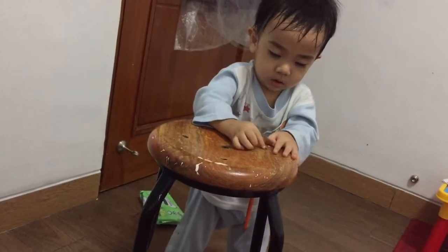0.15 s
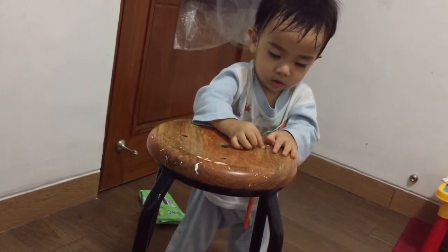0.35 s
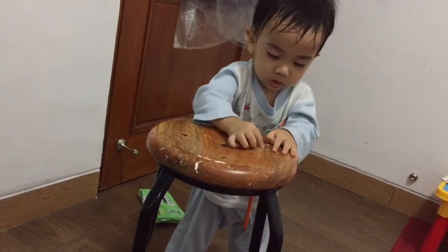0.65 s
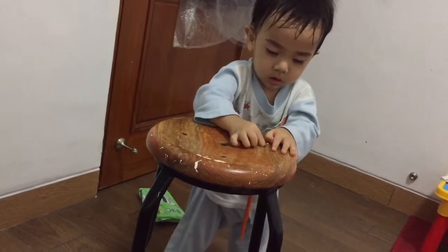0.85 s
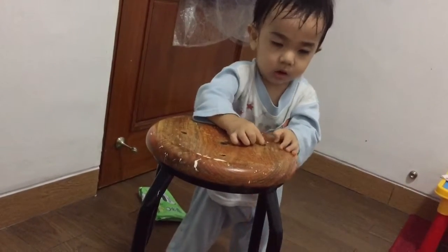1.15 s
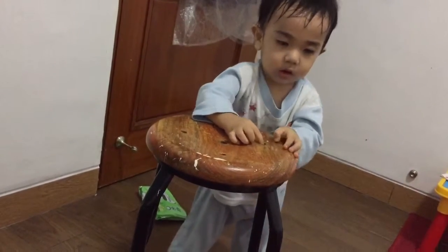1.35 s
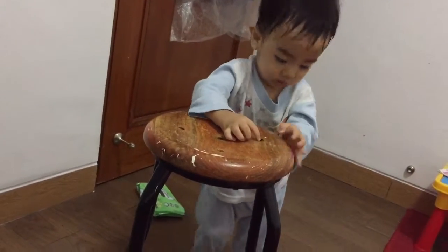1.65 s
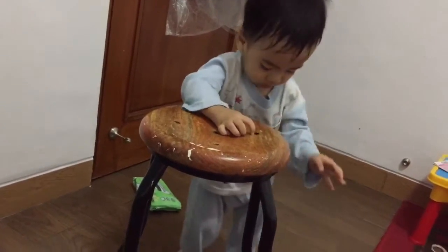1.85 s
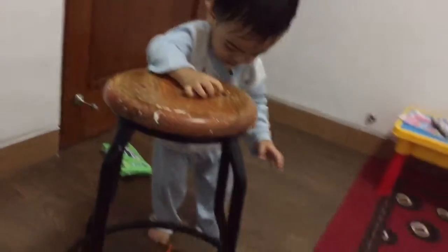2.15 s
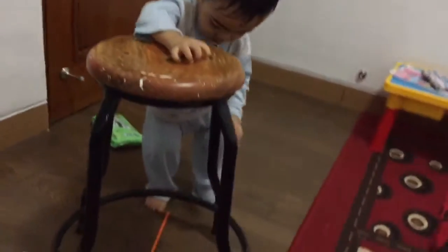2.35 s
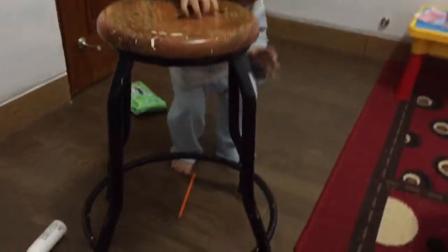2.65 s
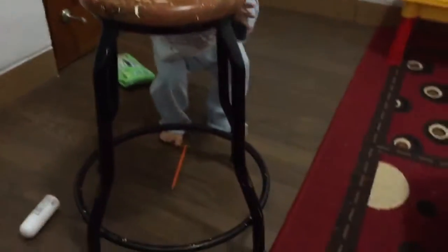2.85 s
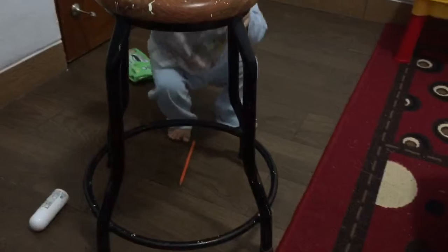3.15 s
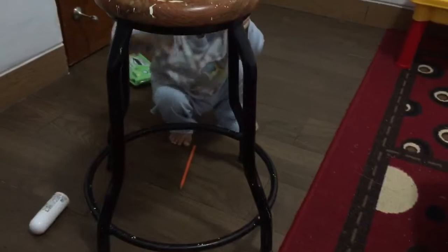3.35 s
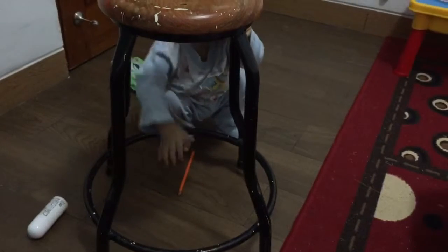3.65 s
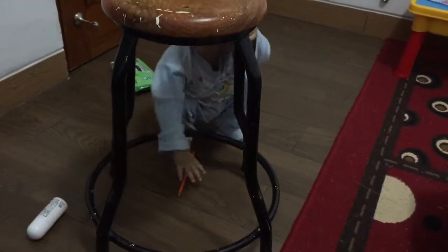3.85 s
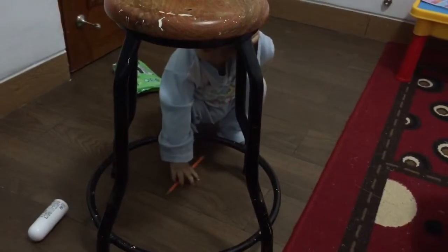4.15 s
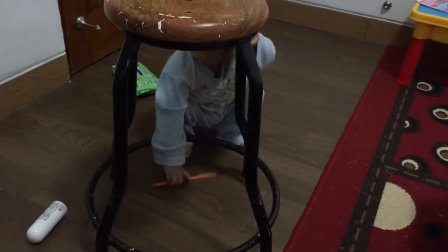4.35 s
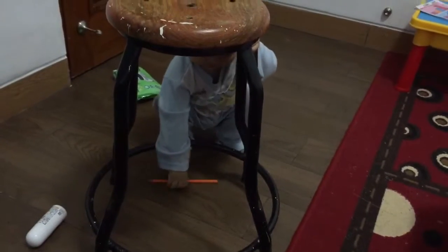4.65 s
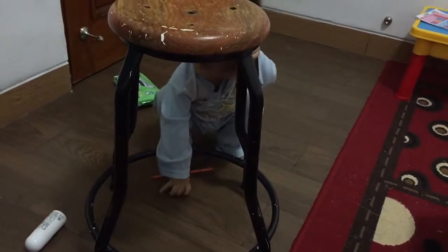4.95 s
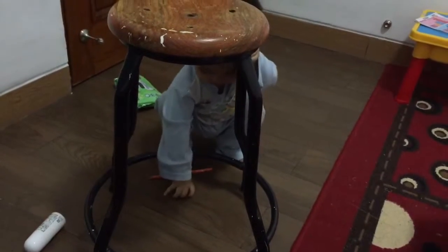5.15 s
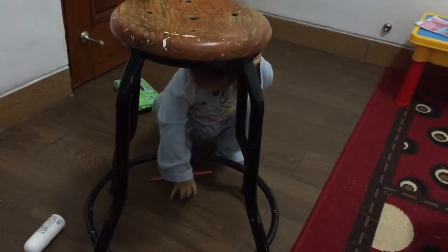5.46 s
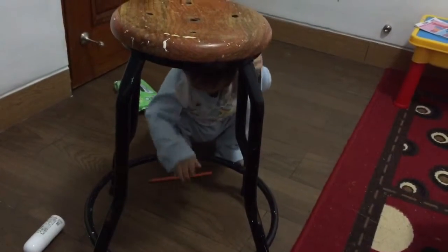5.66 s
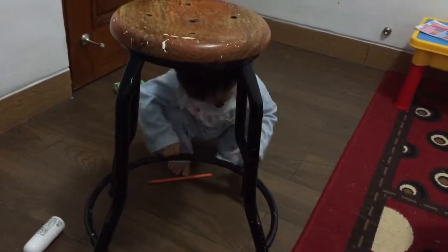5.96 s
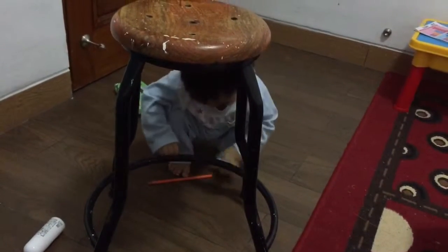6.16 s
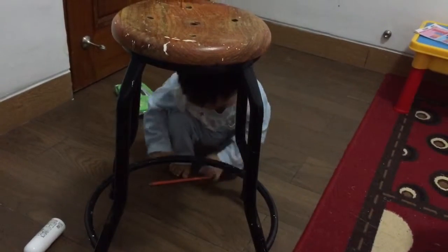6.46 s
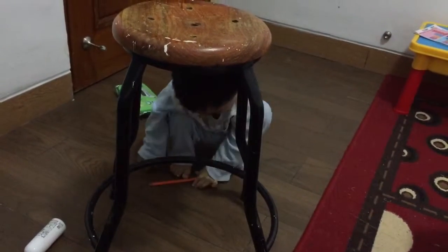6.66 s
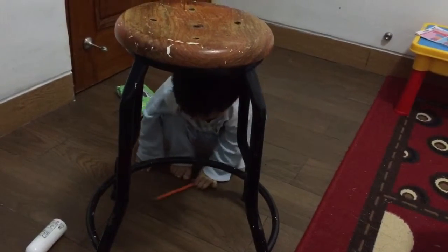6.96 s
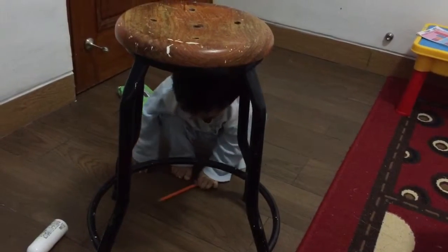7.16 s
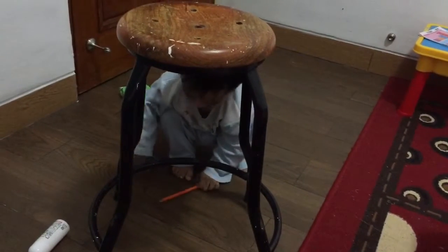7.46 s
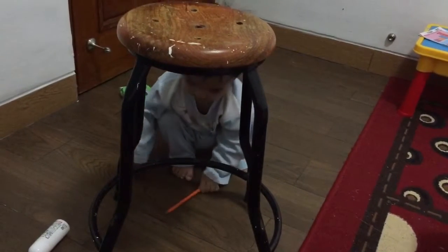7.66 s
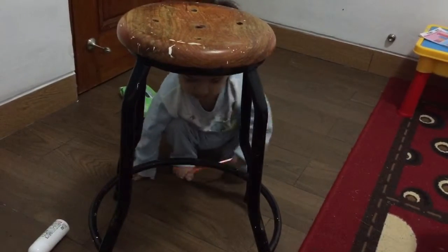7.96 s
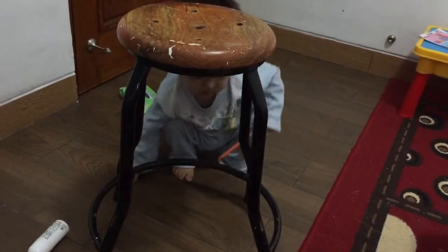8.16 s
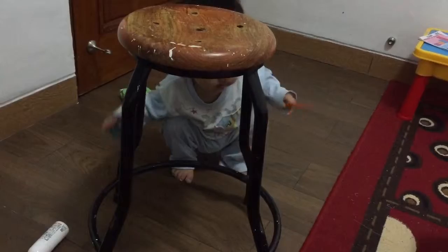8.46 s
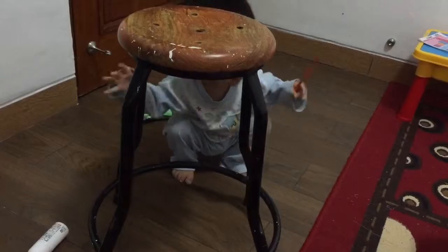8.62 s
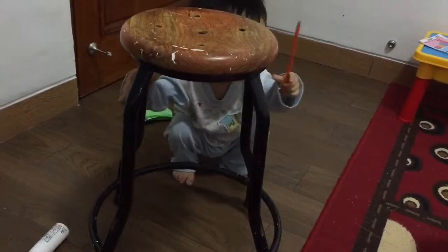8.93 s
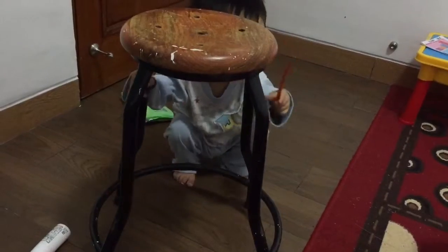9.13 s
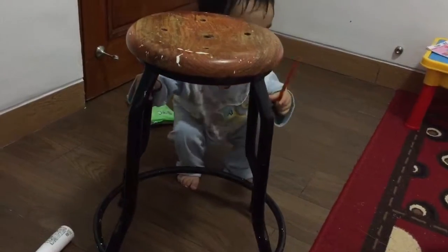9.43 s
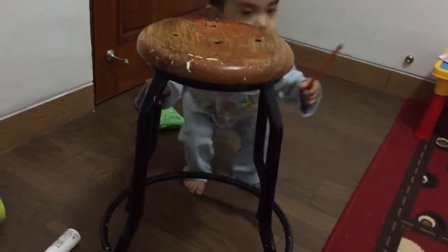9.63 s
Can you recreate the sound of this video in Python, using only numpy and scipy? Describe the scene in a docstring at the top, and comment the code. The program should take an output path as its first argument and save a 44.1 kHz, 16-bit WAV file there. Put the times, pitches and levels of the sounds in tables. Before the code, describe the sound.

A pencil ticks and drops onto a wooden floor with a bright clatter, then soft limb thuds, cloth rustle and two ringing taps on a steel stool.

```python
"""A small room with a wooden floor, where a toddler plays at a steel-legged stool; hand-held camera.
A pencil ticks, drops and bounces: noisy contacts excite its tip, its bending modes and the wood below.
Hands and knees bump the boards and the foot ring through soft low-pass contacts; sleeves brush as noise.
Then the pencil strikes the steel frame twice: beating modes over a dense clatter.
Nearest the microphone are faint low handling bumps; behind everything lies steady room noise."""
import sys
import numpy as np
from scipy import signal
from scipy.fft import rfft, irfft, next_fast_len
from scipy.io import wavfile
from scipy.ndimage import uniform_filter1d

SR = 44100
rng = np.random.default_rng(int(sys.argv[2]) if len(sys.argv) > 2 else 0)


def unload_wav(signal):
    """Save mono or channel-first audio to the path in sys.argv[1] as 16-bit WAV at rate SR, clipped to [-1, 1]."""
    wavfile.write(
        sys.argv[1],
        SR,
        np.round(np.clip(np.atleast_2d(signal).T, -1, 1) * 32767).astype(np.int16),
    )


N = 431738

# Pencil contacts. Each row: start in seconds, ring level in dB, ring tilt in dB per octave,
# tip crack level in dB, level of the knock of the wood in dB.
PENCIL_CONTACTS = [(1.2383, -37, -4.5, -40.5, -34), (1.3363, -61, 8, -60, -49.5),
                   (1.6334, -23, 8.5, -23, -47), (1.7536, -28.5, 5.5, -44, -56.5),
                   (1.961, -47, -4.5, -62, -70), (3.486, -56, -11.5, -75.5, -74),
                   (5.131, -55, -6, -67, -69), (5.1427, -40.5, 4.5, -45.5, -50),
                   (5.1815, -52, -1, -68, -69.5), (8.1545, -57, 0, -45.5, -40.5)]
# After the drop each end of the pencil bounces on. Each row: first bounce in seconds,
# its ring level in dB, flight to the next bounce in seconds.
PENCIL_END_BOUNCES = [(1.798, -45.5, .083), (1.8585, -55, .099)]
# Bending modes of the pencil. Each row: usual frequency in Hz, width in Hz, level in dB.
PENCIL_MODES = [(2207, 111.3, -5.5), (4050, 150, 2.5), (6183, 250, 2), (8840, 420, 3), (11700, 500, -0.5),
                (15120, 1600, -9)]
# Colour of the tip's crack. Each row: frequency in Hz, level in dB per Hz.
TIP_CRACK_COLOUR = [(60, -48), (400, -32), (900, -17.5), (2000, 2.5), (2700, -6.5), (3600, -5.5),
                    (5500, 1.5), (7500, -13), (10000, 4), (11700, 8), (13000, 6), (15500, 6.5)]
# Colour of the wood under the tip. Each row: frequency in Hz, level in dB per Hz.
WOOD_KNOCK_COLOUR = [(40, -38.5), (200, -16), (600, -15), (950, 0), (1400, -2), (2100, -6), (2800, -15.5),
                     (5000, -25.5), (12000, -40)]
# Pencil blows on the steel frame. Each row: start in seconds, ring gain in dB, clatter level in dB,
# place (0 = foot ring, 1 = leg), ring time as a share of the usual.
FRAME_BLOWS = [(8.1402, -2, -30, 0, 1.4), (8.384, 1, -27.5, 1, 0.92)]
# Modes of the frame. Each row: frequency in Hz, usual decay time t60 in seconds,
# level in dB struck at the foot ring, level in dB struck at the leg.
FRAME_MODES = [(280, 0.55, -51, -57), (587, 0.3, -33, -57), (640, 0.3, -28, -65), (678, 0.3, -37, -68),
               (797, 0.3, -40, -70), (856, 0.3, -39, -67), (990, 0.35, -34, -66), (1276, 0.33, -34, -36),
               (1410, 0.4, -46, -50), (1510, 0.28, -37, -44), (1595, 0.25, -57, -38),
               (1712, 0.25, -51, -32), (1750, 0.3, -44, -28), (1841, 0.3, -40, -46), (1890, 0.27, -38, -47),
               (2482, 0.22, -46, -57), (2681, 0.22, -55, -33), (2740, 0.28, -63, -38),
               (2790, 0.25, -57, -36), (2950, 0.32, -48, -35), (3342, 0.2, -44, -43),
               (3467, 0.27, -55, -42), (3531, 0.31, -59, -36), (4011, 0.25, -50, -40),
               (4109, 0.23, -46, -36), (4382, 0.3, -50, -42), (5572, 0.22, -54, -45),
               (6320, 0.33, -46, -61), (6385, 0.31, -47, -62), (8064, 0.33, -61, -46),
               (15600, 0.16, -51, -63)]
# Dense, short-lived modes of the frame. Each row: frequency in Hz, level in dB per Hz at the
# foot ring, level in dB per Hz at the leg.
CLATTER_COLOUR = [(50, -50, -51), (196, -22, -9.5), (515, -1, -21), (620, 10.5, -18), (1050, 1, -23),
                  (1184, 4, 7), (1930, 8.5, 1), (2220, -6, -11.5), (2870, -1, 10.5), (3750, -9, 0),
                  (4490, -1, 10.5), (4840, -12, 0), (6160, 0.5, -3.5), (7600, -13, -9.5), (8730, -7.5, 3.5),
                  (9200, -18, -15.5), (14850, -30, -17.5)]
# Soft bumps of hands, knees and feet. Each row: start in seconds, boards level in dB, first contact
# corner in Hz, frame gain in dB, deep boom level in dB, loss at each later contact in dB.
LIMB_BUMPS = [(3.365, -52, 300, -44, -72, 16), (3.471, -41.5, 754, -15.5, -51, 0.3),
              (3.6635, -56, 1800, -38, -62, 12), (3.801, -47, 297, -22, -52, 8),
              (3.985, -53.5, 900, -32, -61, 7), (5.143, -54.5, 694, -25, -60.5, 7),
              (5.402, -39.5, 545, -24, -61, 8.5), (5.4461, -47.5, 1013, -19, -46.5, 9.5),
              (6.108, -54.5, 700, -11.5, -55.5, 14), (7.326, -55, 247, -43, -65.5, 18.5),
              (8.779, -48.5, 1100, -36, -64, 8), (9.248, -44.5, 910, -22, -48, 4)]
# Modes of the floorboards. Each row: frequency in Hz, width in Hz, level in dB.
BOARD_MODES = [(178.4, 35, 4.5), (220.6, 24, 6.5), (247, 38, 0.5), (349, 104, -2), (374.4, 35, -1.5),
               (516, 124, -10), (613, 130, -4.5), (840, 190, -1.5), (1054, 130, -10.5), (1270, 300, -11.5),
               (1640, 700, -12.5)]
# Deep modes of the whole floor. Each row: frequency in Hz, width in Hz, level in dB.
FLOOR_MODES = [(48.5, 5.5, -4.5), (82, 32, -2)]
# Longer strokes of sleeves and palms. Each row: middle in seconds, half length in seconds,
# scuff level in dB, cloth hiss level in dB.
STROKES = [(2.852, 0.0093, -64.5, -73), (3.77, 0.11, -63, -76), (3.98, 0.04, -59.5, -64),
           (5.674, 0.072, -71, -76), (5.957, .17, -81, -70.5), (6.085, 0.052, -69, -64.5)]
# Colour of palms on wood. Each row: frequency in Hz, level in dB per Hz.
SCUFF_COLOUR = [(250, -18), (750, 9), (1400, 8), (2200, -3.5), (4000, -21.5)]
# Colour of the cloth hiss. Each row: frequency in Hz, level in dB per Hz.
CLOTH_COLOUR = [(1500, -6), (3000, 11.5), (4600, -3), (6300, 7), (7400, -2), (8600, 8), (10300, -2),
                (12000, 2), (15500, -3)]
# Fingers shift on the camera. Each row: start in seconds, level in dB, frequency settled to in Hz.
FINGER_SHIFTS = [(2.507, -61, 85), (2.706, -49.5, 82), (2.844, -49, 87), (9.678, -55.5, 59.7)]
# Colour of the steady room noise. Each row: frequency in Hz, relative level in dB.
ROOM_NOISE_COLOUR = [(22, -30.5), (38, -11), (55, 0.5), (145, -5), (180, -2), (240, -5.5), (550, -8),
                     (1500, -9), (1950, -5.5), (2700, -13), (4200, -15.5), (5200, -20), (9000, -23),
                     (10300, -25), (15800, -26)]
# Decay of the room's diffuse tail. Each row: frequency in Hz, t60 in seconds.
ROOM_DECAY = [(150, .3), (1000, 0.25), (4000, 0.36), (9000, 0.26), (15000, 0.23)]
# Early echoes off the nearest walls. Each row: delay in seconds, level in dB against the diffuse tail.
WALL_ECHOES = [(.0063, -24), (0.0149, -27), (0.015, -7.5), (.0242, -11.5), (0.0325, -23)]

PITCH_SCATTER = .008  # share of the pitch; each landing loads the pencil differently
FLIGHT_SHRINK, BOUNCE_LOSS_DB = .62, 5.5  # each flight over the last; loss a bounce
# Tilt in dB per octave; crack and knock relative to the ring.
BOUNCE_TILT_DB, BOUNCE_CRACK_DB, BOUNCE_KNOCK_DB = -3.5, -15, -16
SETTLE_S, SETTLE_SCATTER_S = .0195, 0.0019  # mean gap between a limb's contacts, and its scatter
SETTLE_SOFTENS = 0.93  # contact corner over the last one
BRUSH_LAG_S, BRUSH_HALF_S = 0.015, 0.028  # the sleeve brushes along just after each bump
BRUSH_SCUFF_DB, BRUSH_CLOTH_DB = -21.5, -37  # relative to the boards
ROOM_NOISE_DB = -66
TOP_HZ = 15850  # the camera's band limit
AGE = np.arange(SR * 3 // 4) / SR  # time since a blow (s)
BINS = np.fft.rfftfreq(len(AGE) * 2, 1 / SR)  # (Hz)


def pencil():
    """Each contact cracks at the tip, rings the pencil's bending modes and knocks the wood beneath."""
    out = np.zeros(N)
    lowest_hz = PENCIL_MODES[0][0]
    octaves = np.log2(np.maximum(BINS, lowest_hz) / lowest_hz)
    for s, ring_db, tilt_db, crack_db, knock_db in [*PENCIL_CONTACTS, *bounces()]:
        hardness = causal(tilt_db * octaves)
        modes = np.array(PENCIL_MODES) * [1 + PITCH_SCATTER * rng.standard_normal(), 1, 1]
        ring = through(contact(t60=0.037, chatter=0.76), resonances(modes) * hardness)
        crack = through(contact(t60=0.022, chatter=1.5), causal(along(TIP_CRACK_COLOUR, BINS)))
        knock = through(contact(t60=.025, chatter=0.34), causal(along(WOOD_KNOCK_COLOUR, BINS)))
        add(out, s, in_room(amp(ring_db) * ring, wet_db=-6.0))
        add(out, s, in_room(amp(crack_db) * crack, wet_db=-6))
        add(out, s, in_room(amp(knock_db) * knock, wet_db=-2.5))
    return out


def bounces(count=4):
    """Each end of the fallen pencil lands ever sooner and more softly."""
    k = np.arange(count)
    for start, first_db, flight in PENCIL_END_BOUNCES:
        flights = flight * FLIGHT_SHRINK ** k
        starts = start + np.cumsum(flights) - flights
        for s, db in zip(starts, first_db - BOUNCE_LOSS_DB * k):
            yield s, db, BOUNCE_TILT_DB, db + BOUNCE_CRACK_DB, db + BOUNCE_KNOCK_DB


def frame_blows():
    """Hard blows on the steel tube: clear modes over a dense clatter."""
    out = np.zeros(N)
    for s, ring_db, clatter_db, place, sustain in FRAME_BLOWS:
        colour = np.array(CLATTER_COLOUR)[:, [0, 2 if place > .5 else 1]]
        clatter = through(contact(t60=0.083, chatter=3.9), causal(along(colour, BINS)))
        add(out, s, amp(ring_db) * frame_ring(place, sustain=sustain))
        add(out, s, in_room(amp(clatter_db) * clatter, wet_db=-1.5))
    return out


def frame_ring(place, corner_hz=np.inf, attack=0.0012, sustain=1):
    """The frame's modes; a soft contact weakens the high ones, and close pairs make each one beat."""
    hz, t60, ring_db, leg_db = np.transpose(FRAME_MODES)[:, :, None]
    size = amp(leg_db if place > .5 else ring_db) / (1 + (hz / corner_hz) ** 2)
    twin_hz = hz + rng.choice([-1, 1], hz.shape) * rng.uniform(12, 30, hz.shape)
    phase = rng.random((2, *hz.shape))  # in turns
    mode = np.sin(2 * np.pi * (hz * AGE + phase[0]))
    twin = np.sin(2 * np.pi * (twin_hz * AGE + phase[1]))
    ring = (size * fade(t60 * sustain) * (mode + .3 * twin)).sum(0)
    return ring * (1 - np.exp(-AGE / attack))


def bumps():
    """Soft limbs thud on the boards and shake the foot ring; the softer the contact, the duller and slower."""
    out = np.zeros(N)
    for s, boards_db, corner_hz, frame_db, boom_db in settling():
        flesh = 1 / (1 + 1j * BINS / corner_hz) ** 2
        thud = through(contact(t60=0.027, chatter=0.95), resonances(BOARD_MODES) * flesh)
        boom = through(AGE == 0, resonances(FLOOR_MODES) * flesh)
        ring = frame_ring(place=0, corner_hz=corner_hz, attack=2 / corner_hz)
        ring = ring * fade(t60=0.94)  # the limb damps the tube
        add(out, s, in_room(amp(boards_db) * thud, wet_db=-5.0))
        add(out, s, amp(boom_db) * boom + amp(frame_db) * ring)
    return out


def settling(count=4):
    """A limb lands, then settles in ever weaker and softer contacts."""
    for s, boards_db, corner_hz, frame_db, boom_db, loss_db in LIMB_BUMPS:
        gaps = SETTLE_S + SETTLE_SCATTER_S * rng.standard_normal(count)
        for k in range(count):
            lost_db = k * loss_db
            if lost_db < 20:  # weaker contacts are left out
                start, softer_hz = s + gaps[:k].sum(), corner_hz * SETTLE_SOFTENS ** k
                yield start, boards_db - lost_db, softer_hz, frame_db - lost_db, boom_db - lost_db


def slides():
    """Palms scuff the wood and cloth hisses; each stroke swells and fades in uneven little slips."""
    t = np.arange(N) / SR
    slips = unit(uniform_filter1d(rng.standard_normal(N), size=200))
    grain = amp(2.05 * slips)  # 2.05 dB rms of unevenness
    scuff, cloth = unit(noise(SCUFF_COLOUR) * grain), unit(noise(CLOTH_COLOUR) * grain)
    brushes = [(s + BRUSH_LAG_S, BRUSH_HALF_S, boards_db + BRUSH_SCUFF_DB, boards_db + BRUSH_CLOTH_DB)
               for s, boards_db, *_ in LIMB_BUMPS]
    out = np.zeros(N)
    for middle, half, scuff_db, cloth_db in [*STROKES, *brushes]:
        swell = np.exp(-((t - middle) / half) ** 2)
        out += swell * (amp(scuff_db) * scuff + amp(cloth_db) * cloth)
    return out


def handling():
    """Dry, low pushes that travel through the camera's body."""
    out = np.zeros(N)
    for s, db, hz in FINGER_SHIFTS:
        turns = hz * (AGE + 0.0063 * (1 - fade(0.016)))  # the push starts quick and slackens
        add(out, s, amp(db) * np.sin(2 * np.pi * turns) * np.exp(-(AGE / 0.019) ** 2))
    return out


def room_noise():
    """The room's steady background, as coloured random noise."""
    return amp(ROOM_NOISE_DB) * noise(ROOM_NOISE_COLOUR)


def in_room(x, wet_db, gap=0.0074):
    """A blow, its echoes off the nearest walls and its own diffuse tail, which builds up over the gap (s)."""
    hz, t, z = signal.stft(rng.standard_normal(len(AGE)), SR, nperseg=256)
    decay = np.exp(-np.log(1000) * t / along(ROOM_DECAY, hz)[:, None])
    tail = signal.istft(z * decay, SR, nperseg=256)[1][:len(AGE)]
    tail = tail * (1 - np.exp(-(AGE / gap) ** 2))
    tail /= np.linalg.norm(tail)
    for delay, db in WALL_ECHOES:
        add(tail, delay, amp([db]))
    return x + amp(wet_db) * signal.fftconvolve(x, tail)[:len(AGE)]


def contact(t60, chatter):
    """One sharp push followed by a dying chatter."""
    rattle = rng.standard_normal(len(AGE)) * fade(t60)
    return (AGE == 0) + chatter * rattle / np.linalg.norm(rattle)


def through(force, response):
    """A force played through a body, at unit strength."""
    return unit_blow(irfft(rfft(force, 2 * len(AGE)) * response)[:len(AGE)])


def resonances(modes):
    """Response of damped (Hz, width, dB) modes, alternating in sign."""
    response = 0
    for k, (hz, width, db) in enumerate(modes):
        damping = 1j * BINS * width
        response = response + (-1) ** k * amp(db) * damping / (hz * hz - BINS ** 2 + damping)
    return response


def causal(db):
    """Minimum-phase response with the given gains."""
    cepstrum = irfft(db * np.log(10) / 20)
    cepstrum[1:len(AGE)] *= 2
    cepstrum[len(AGE) + 1:] = 0
    return np.exp(rfft(cepstrum))


def noise(spectrum):
    """Steady coloured noise of rms 1."""
    m = next_fast_len(N)
    gains = amp(along(spectrum, np.fft.rfftfreq(m, 1 / SR)))
    return unit(irfft(rfft(rng.standard_normal(m)) * gains, m)[:N])


def along(points, hz):
    """(Hz, value) points read on a log frequency axis."""
    f, v = np.transpose(points)
    return np.interp(np.log(hz + 1), np.log(f + 1), v)


def fade(t60):
    """Exponential decay after a blow, by 60 dB in t60 seconds."""
    return np.exp(-np.log(1000) * AGE / t60)


def amp(db):
    """Decibels to gain."""
    return 10 ** (np.asarray(db) / 20)


def unit(x):
    """Scaled to rms 1."""
    return x / np.sqrt(np.mean(x ** 2) + 1e-20)


def unit_blow(x):
    """Scaled to the energy of 5 ms at rms 1."""
    return x / np.sqrt(np.sum(x ** 2) / (.005 * SR) + 1e-20)


def add(track, s, sound):
    """Mix a sound into the track at time s."""
    part = track[round(s * SR):][:len(sound)]
    part += sound[:len(part)]


def scene():
    """All sources over the room's steady noise, in one channel."""
    near = pencil() + frame_blows() + bumps() + slides() + handling()
    return (near + room_noise())[None]


def record(dry):
    """The camera keeps nothing above its band limit."""
    m = next_fast_len(N + SR // 2)
    kept = np.fft.rfftfreq(m, 1 / SR) < TOP_HZ
    return irfft(rfft(dry, m) * kept, m)[:, :N]


dry = scene()
out = record(dry)
unload_wav(out)
```